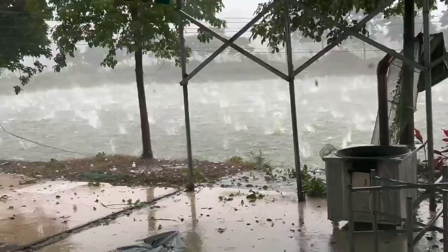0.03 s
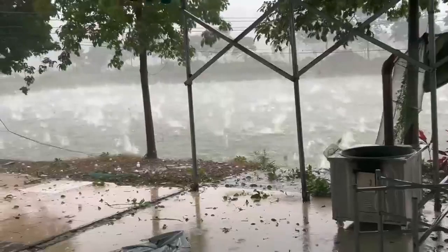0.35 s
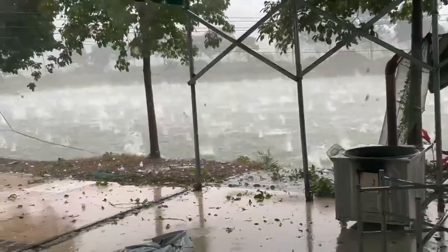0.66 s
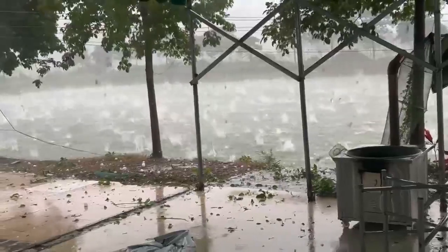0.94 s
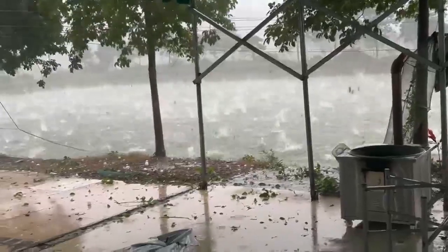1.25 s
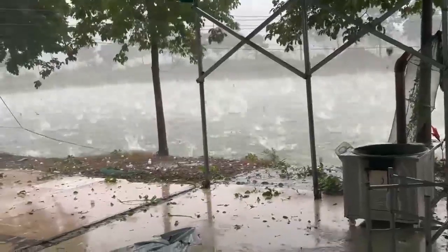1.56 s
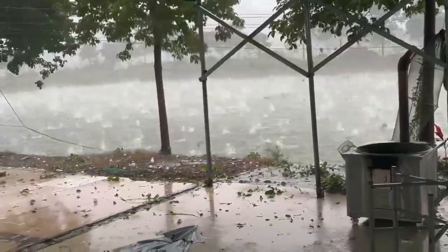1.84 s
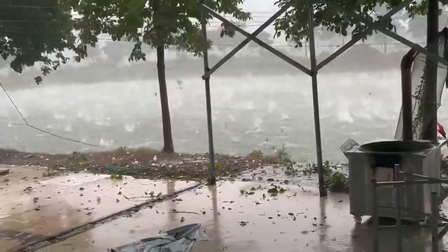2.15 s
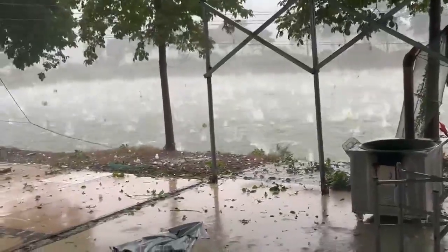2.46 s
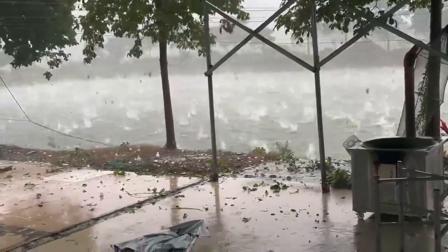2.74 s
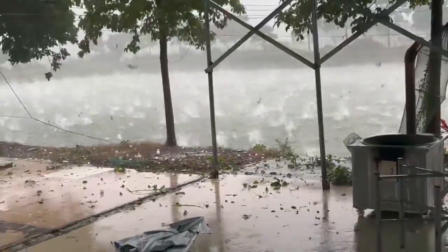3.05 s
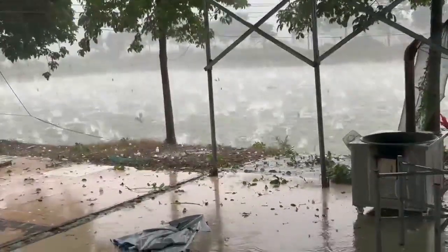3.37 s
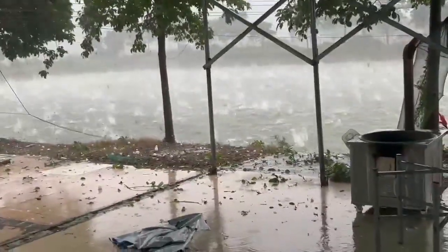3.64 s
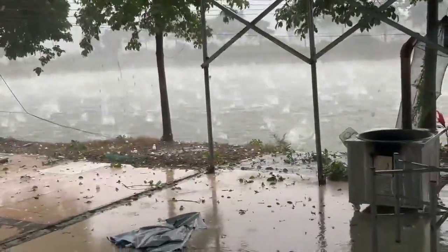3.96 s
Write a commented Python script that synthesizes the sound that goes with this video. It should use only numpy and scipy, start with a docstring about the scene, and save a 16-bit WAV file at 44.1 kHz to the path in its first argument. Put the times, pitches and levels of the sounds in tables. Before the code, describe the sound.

Heavy hail pounds a thin metal roof overhead throughout, with irregular booming thuds, dull patter and cracking ice over rain hissing on a pond and pavement. The hardest knocks land around 0.5 and 1.3 seconds. A steel tube pings at about 1.1 seconds, and ice rattles on metal near 0.7, 1.6, 2.4 and 2.7 seconds. The blows lighten after 3 seconds, with one more strong hit near 4.

```python
"""Hail on a thin sheet roof, heard from underneath, in heavy rain beside a pond.
Each big stone sends a quick, falling bending wave through the sheet: a thud, then a rumble and a
spray of ice. Some blows boom, some land with a hard knock; small stones patter dully.
Others rattle on metal or ping off a steel tube, over the hiss of rain on water and pavement.
A limiter holds the loudest blows down."""
import sys
import numpy as np
from scipy import signal
from scipy.io import wavfile
from scipy.ndimage import uniform_filter1d, minimum_filter1d

SR = 44100
rng = np.random.default_rng(int(sys.argv[2]) if len(sys.argv) > 2 else 0)


def persist_wave(psi):
    """Save psi, clipped to +-1, as 16-bit WAV."""
    counts = np.round(np.clip(psi, -1, 1) * 32767).astype(np.int16)
    wavfile.write(sys.argv[1], SR, np.atleast_2d(counts).T)


N = 176400
T = np.arange(N) / SR


def from_db(db):
    """Decibels to gain."""
    return 10 ** (np.asarray(db) / 20)


def unit_rms(x):
    """Scale to rms 1."""
    return x / np.sqrt(np.mean(x ** 2) + 1e-20)


def at_hz(table, hz):
    """Read a table on a log-frequency axis."""
    freqs, values = np.transpose(table)
    return np.interp(np.log(hz), np.log(freqs), values)


def add(out, start_s, x):
    """Mix x into out at start_s."""
    i = int(np.clip(start_s * SR, 0, N - 1))
    out[i:i + len(x)] += x[:N - i]


def butter(x, hz, kind="band"):
    """Butterworth filter, 12 dB per octave."""
    return signal.sosfilt(signal.butter(2, hz, kind, fs=SR, output="sos"), x)


def drift(per_s):
    """Random wander, rms 1."""
    knots = rng.standard_normal(int(per_s * N / SR) + 2)
    return unit_rms(np.interp(T * per_s, np.arange(len(knots)), knots))


def noise_bands(spectrum):
    """Half-octave (Hz, noise) pairs, summing to rms 1."""
    edges = 25 * 2 ** np.arange(0, 9.6, .5)
    centres = np.sqrt(edges[1:] * edges[:-1])
    white = rng.standard_normal((2, N))
    parts = np.array([from_db(at_hz(spectrum, hz)) * butter(white[k % 2], edges[k:k + 2])
                      for k, hz in enumerate(centres)])
    return list(zip(centres, parts / parts.sum(0).std()))


def ring(x, hz, t60_s):
    """Damped mode: a unit click starts a sine of height 1."""
    r, w = from_db(-60 / (t60_s * SR)), 2 * np.pi * hz / SR
    return signal.lfilter([0, np.sin(w)], [1, -2 * r * np.cos(w), r * r], x + 1e-18)


def resonate(x, hz, width_hz):
    """Steep-sided resonance, rms 1."""
    return unit_rms(butter(x, [hz - width_hz / 2, hz + width_hz / 2]))


def grains(per_s, spread_db):
    """Random clicks, mostly small, a few large."""
    sizes = from_db(spread_db * np.minimum(rng.exponential(1, N), 4)) * rng.choice([-1, 1], N)
    return sizes * (rng.random(N) < per_s / SR)


def swell(start_s, rise_s, fade_s):
    """Linear rise, exponential fade."""
    t = T - start_s
    return np.clip(t / rise_s, 0, 1) * np.exp(-np.maximum(t - rise_s, 0) / fade_s)


def blows(times_s, levels_db, rise_s, fade_s):
    """Envelope of blows whose energies add and decay, with rounded attacks."""
    energy = np.zeros(N)
    for s, db in zip(times_s, levels_db):
        add(energy, s, from_db([db]) ** 2)
    envelope = np.sqrt(signal.lfilter([1], [1, -np.exp(-2 / (fade_s * SR))], energy + 1e-18))
    pole = np.exp(-1 / (rise_s * SR))
    return signal.lfilter([1 - pole], [1, -pole], envelope)


# Downpour contour: (time [s], relative level [dB])
RAIN_CONTOUR = [(0.3, -37.5), (0.76, -36.5), (0.96, -35), (1.47, -35.5), (1.56, -34), (1.66, -34),
                (2.07, -40), (2.2, -35), (2.43, -41.5), (2.63, -39), (2.73, -31.5), (2.9, -38),
                (3.13, -39.5), (3.47, -39), (3.95, -42)]
# Rain on pond and pavement: (frequency [Hz], relative density [dB])
RAIN_SPECTRUM = [(30, -18), (70, 2.5), (150, 8), (300, 1.5), (600, -1), (1100, -5.5), (2000, -4),
                 (3000, -14), (5000, -15), (7500, -16.5), (11000, -20), (13500, -21)]


def rain():
    """Far rain merges into a hiss; near drops tick on the wet pavement."""
    times, levels = np.transpose(RAIN_CONTOUR)
    strength = from_db(0.91 * np.interp(T, times, levels - levels.mean()))
    hiss = sum(noise * from_db(3.72 * drift(24.973)) for _, noise in noise_bands(RAIN_SPECTRUM))
    clicks = grains(per_s=220, spread_db=3.6)
    pitches_hz = np.geomspace(1100, 13000, 20)
    pitch_index = rng.integers(0, len(pitches_hz), N)
    tilt = from_db(-0.5 * np.log2(pitches_hz / pitches_hz[0]))
    drops = sum(tilt[k] * ring(clicks * (pitch_index == k), hz, t60_s=4.8 / hz)
                for k, hz in enumerate(pitches_hz))
    return strength * (from_db(-33) * hiss + from_db(-43.5) * unit_rms(drops))


def patter(per_s=19, level_db=-36, spread_db=3):
    """Small stones land all over the roof with dull puffs."""
    when, size = rng.random((int(per_s * N / SR), 2)).T
    body = unit_rms(butter(rng.standard_normal(N), [170, 620]))
    levels = level_db + spread_db * (2 * size - 1)
    return body * blows(when * N / SR, levels, rise_s=0.00081, fade_s=0.02)


def bending_wave(body_hz, distance, start_hz=824):
    """Highs travel faster in the sheet, so the pitch falls, more slowly from farther off."""
    t = T[:SR // 12]
    body_s, attack_s, fade_s = 0.01233 * distance, 0.0014, 0.012 * distance
    period_s = 1 / start_hz + (1 / body_hz - 1 / start_hz) * (t / body_s) ** 0.858
    envelope = (1 - np.exp(-t / attack_s)) * np.exp(-(t / fade_s) ** 1.06)
    return -np.sin(2 * np.pi * np.cumsum(1 / period_s) / SR) * envelope


def scatter(wave, db, near_db=-10, far_db=-18, fade_s=0.0069):
    """Weaker stones land farther off; the sheet's ribs scatter more of their wave."""
    t = T[:SR // 30]
    reflections = rng.standard_normal(len(t)) * np.exp(-t / fade_s)
    jumble = unit_rms(signal.fftconvolve(wave, reflections)[:len(wave)])
    share = np.clip((near_db - db) / (near_db - far_db), 0, 1)
    return np.sqrt(1 - share) * wave + np.sqrt(share) * wave.std() * jumble


# Big stones on the roof: (time [s], relative thud level [dB], body pitch [Hz], relative ice level [dB])
BIG_STONES = [(0.111, -15.5, 147, -29), (0.172, -11, 176, -35), (.217, -10, 228, -34.5),
              (0.285, -19.5, 183, -31), (.400, -8, 206, -28.5), (.463, 0, 191, -30), (0.485, -12, 268, -43),
              (.522, -6, 369, -34.5), (0.613, -10, 233, -40), (0.744, -4.5, 159, -30),
              (0.817, -2.5, 126, -31.5), (0.833, -17, 130, -31.5), (0.929, -6, 207, -28),
              (0.943, -10, 144, -49), (1.021, -14.5, 210, -58), (1.099, -11, 195, -32.5),
              (1.163, -18, 198, -31), (1.305, -21, 181, -32), (1.322, 3, 140, -20), (1.334, -8, 149, -42),
              (1.36, 1, 156, -31), (1.383, -10, 255, -42), (1.422, -20, 248, -30.5),
              (1.611, -8.5, 194, -28.5), (1.667, -5, 138, -30.5), (1.748, -4, 186, -32),
              (1.794, -8, 194, -56), (1.873, -4.5, 185.5, -27), (1.905, -12, 246, -55),
              (1.962, -8, 221, -30), (2.000, -5.5, 203.4, -29), (2.031, -8, 197, -27.5),
              (2.06, -5.5, 212, -30), (2.104, -10.5, 232, -33.5), (2.138, -4, 147, -28),
              (2.17, -16, 149, -33), (2.338, -27, 200, -29.5), (2.42, -16, 155, -25),
              (2.441, -4.5, 140, -26.5), (2.462, -5, 186, -32), (2.531, -12, 220, -33),
              (2.577, -10.5, 200, -31.5), (2.647, -7.5, 154, -29.5), (2.668, -10.5, 143, -29.5),
              (2.873, -5, 176, -40), (2.912, -10.5, 215, -53), (3.104, -5.5, 158, -34.5),
              (3.12, -9, 170, -33), (3.168, -17, 203, -45), (3.325, -14.5, 225, -51),
              (3.352, -14.5, 186, -34.5), (3.406, -17, 156, -33.5), (3.549, -14, 204, -32),
              (3.616, -18, 176, -52), (3.681, -13.5, 233, -35.5), (3.775, -17, 198, -34),
              (3.895, -17, 220, -34.5), (3.968, -4, 226, -28.5)]


def thuds(direct_db=-3.5, echo_db=-17.5, echo_s=0.016):
    """Each big stone's bending wave arrives directly, then returns from the sheet's edge."""
    out = np.zeros(N)
    jitter = rng.uniform(-1.096, 1, (len(BIG_STONES), 3))
    for (s, db, hz, _), (far, lag, detune) in zip(BIG_STONES, jitter):
        direct = bending_wave(hz, distance=1 + 0.16 * far)
        echo = bending_wave(hz * (1.332 + 0.3 * detune), distance=1.353)
        add(out, s, from_db(db + direct_db) * scatter(direct, db))
        add(out, s + echo_s * (1 + 0.365 * lag), from_db(db + echo_db) * scatter(echo, db + echo_db))
    return out


# Sheet rumble: (frequency [Hz], relative density [dB])
RUMBLE_SPECTRUM = [(30, -33), (50, -7), (72, -2.5), (130, 0.5), (240, 5.5), (450, -4), (700, -8.5),
                   (1200, -19.5), (2100, -15.5), (4000, -63)]
# Sheet decay: (frequency [Hz], t60 [s])
RUMBLE_DECAY = [(70, 0.59), (200, 0.22), (500, 0.41), (2000, 0.31)]


def rumble():
    """The sheet rumbles after each big stone, each band decaying at its own rate."""
    times, levels, _, _ = np.transpose(BIG_STONES)
    out = np.zeros(N)
    for hz, noise in noise_bands(RUMBLE_SPECTRUM):
        fade_s = at_hz(RUMBLE_DECAY, hz) / np.log(1000)
        out += noise * blows(times, levels - 10.5, rise_s=0.0021, fade_s=fade_s)
    return out


def clacks(centre_hz=1200, peak_s=0.00087):
    """Big stones clack at the instant of contact with the roof."""
    out, t = np.zeros(N), T[:SR // 10]
    envelope = t / peak_s * np.exp(1 - t / peak_s)
    for s, _, _, ice_db in BIG_STONES:
        hz = centre_hz * 2 ** rng.normal(0, 0.4)
        add(out, s, from_db(ice_db + 3) * np.sin(2 * np.pi * hz * t) * envelope)
    return out


# Shattering ice: (frequency [Hz], relative density [dB])
ICE_SPECTRUM = [(300, -13), (800, 8), (2000, 0.5), (3200, 0), (5000, -5.5), (8000, -5.5), (13500, -16.5)]


def ice(pivot_db=-30.5):
    """Each big stone cracks and sprays gritty chips; hard hits crack out of proportion."""
    times, _, _, levels = np.transpose(BIG_STONES)
    chips = sum(noise * from_db(1.95 * drift(150)) for _, noise in noise_bands(ICE_SPECTRUM))
    grit = unit_rms(chips * from_db(0.26 * drift(900)))
    excess_db = levels - pivot_db
    crack = blows(times + 0.00033, levels + excess_db - 2.5, rise_s=0.00066, fade_s=0.01)
    spray = blows(times, levels - 1.5, rise_s=0.0099, fade_s=0.062)
    return grit * (crack + spray)


# Deep roof modes: (frequency [Hz], gain [dB], t60 [s])
DEEP_MODES = [(70.6, -22, 0.36), (105, -13, 0.16), (146.6, -18.5, 0.22)]


def roof_modes(pivot_hz=140, db_per_octave=32, lag_s=0.0076):
    """Heavy, low-pitched stones drive the roof's deep modes hardest."""
    pushes = np.zeros(N)
    for s, db, hz, _ in BIG_STONES:
        add(pushes, s + lag_s, from_db([db + db_per_octave * np.log2(pivot_hz / hz)]))
    pushes = butter(pushes, 54, "high")  # the pushes are high-passed, so little deep bass builds up
    return sum(from_db(db) * ring(pushes, hz, t60_s) for hz, db, t60_s in DEEP_MODES)


# Hard knocks and ticks: (time [s], relative level [dB], frequency [Hz], t60 [s])
HARD_KNOCKS = [(.5208, -4.5, 1224, .013), (.5218, 1.5, 677, 0.012), (0.5209, -18, 1670, 0.017),
               (1.307, -18, 960, 0.011), (1.3211, -2, 870, 0.011), (1.4215, -4.5, 505, 0.017),
               (1.422, -12, 4800, 0.0024), (1.873, -11, 840, 0.011), (1.961, -18, 1200, 0.0069),
               (2.4215, -23, 8400, 0.0058), (2.423, -16.5, 775, 0.014), (3.412, -18, 11000, 0.00097),
               (3.436, -14, 10800, 0.001), (3.895, -14.5, 424, .022), (3.97, -20, 1950, 0.01)]


def knocks(rise_cycles=1.83):
    """Short, hard knocks and sharp ticks, many being the bright attack of stones hitting the roof."""
    out, t = np.zeros(N), T[:SR // 10]
    for s, db, hz, t60_s in HARD_KNOCKS:
        rise = 1 - np.exp(-(t * hz / rise_cycles) ** 2)
        envelope = 2 * rise * from_db(-60 * t / t60_s)
        add(out, s, from_db(db + 5.5) * np.sin(2 * np.pi * hz * t) * envelope)
    return out


# Single rings: (time [s], level [dB], frequency [Hz], width [Hz], fade [s])
METAL_RINGS = [(.527, -25.5, 1200, 796, 0.06), (1.09, -39, 3480, 600, 0.06),
               (1.16, -35.5, 3270, 1200, 0.081), (1.594, -24, 1620, 900, 0.13),
               (2.005, -27.5, 2040, 600, 0.072), (2.086, -26, 1190, 350, 0.05),
               (2.425, -27, 2100, 700, 0.06), (2.757, -27.5, 2030, 130, 0.024),
               (3.565, -44.5, 4740, 185.2, 0.07), (3.577, -31.5, 1184, 108, 0.07),
               (3.608, -38, 775, 90, 0.044)]


def metal_rings(chips):
    """Ice chips briefly excite metal parts, one resonance each."""
    return sum(from_db(db) * resonate(chips, hz, width_hz) * swell(s, rise_s=0.012, fade_s=fade_s)
               for s, db, hz, width_hz, fade_s in METAL_RINGS)


# Ice rattling on a metal part: (time [s], level [dB], rise [s], fade [s])
RATTLE_BURSTS = [(0.718, -24, 0.018, 0.093), (1.585, -25.5, 0.009, 0.082), (2.42, -28.5, 0.0099, 0.11),
                 (2.745, -22, 0.015, 0.077)]
# The part's resonances: (frequency [Hz], width [Hz], relative level [dB])
RATTLE_MODES = [(1233, 60, -0.5), (1285, 44, 2), (1467, 45, -19), (2015, 127, 2.5), (2224, 520, 0),
                (3280, 236, 0.5), (3550, 220, -6.5)]


def metal_rattles(chips, lag_s_per_octave=0.0089):
    """Skittering chips keep one metal part ringing; higher resonances speak later."""
    out = np.zeros(N)
    norm = np.linalg.norm(from_db([db for _, _, db in RATTLE_MODES]))
    for hz, width_hz, mode_db in RATTLE_MODES:
        lag_s = lag_s_per_octave * np.log2(hz / RATTLE_MODES[0][0])
        envelope = sum(from_db(db) * swell(s + lag_s, rise_s, fade_s)
                       for s, db, rise_s, fade_s in RATTLE_BURSTS)
        out += from_db(mode_db) / norm * resonate(chips, hz, width_hz) * envelope
    return out


# Soft, heavy blows: (time [s], level [dB], frequency [Hz], rise [s])
SOFT_BLOWS = [(0.941, -5, 170, 0.0041), (1.361, -9.5, 203, .005), (2.14, -6, 192, 0.0086),
              (2.441, -5.5, 210, 0.0048), (2.673, -1, 232, 0.0053), (2.675, -14, 77, 0.024),
              (2.696, -8.5, 224, 0.0054), (3.468, -24.5, 86, 0.023)]


def booms():
    """Soft blows make the sheet boom for a few slow cycles."""
    out, t = np.zeros(N), T[:SR // 3]
    for s, db, hz, rise_s in SOFT_BLOWS:
        envelope = (t / rise_s * np.exp(1 - t / rise_s)) ** 2
        add(out, s, from_db(db) * np.sin(2 * np.pi * hz * t) * envelope)
    return out


# Steel tube modes: (frequency [Hz], relative level [dB], t60 [s])
TUBE_MODES = [(4330, -5, 0.6), (4450, -2.5, 0.27), (4500, -2, 0.17), (4700, -9, .08)]


def tube_ping(start_s=1.065, rise_s=0.004, chatter_db=4.5, chatter_per_s=170):
    """A stone strikes a loose tube; its close modes beat and chatter as they fade."""
    out, t = np.zeros(N), np.maximum(T - start_s, 0)
    for hz, db, t60_s in TUBE_MODES:
        envelope = from_db(db + chatter_db * drift(chatter_per_s) - 60 * t / t60_s)
        out += envelope * np.sin(2 * np.pi * hz * t + drift(chatter_per_s))
    return from_db(-28) * np.minimum(t / rise_s, 1) * out


def scene():
    """Roof, ice, metal and rain, in mono."""
    roof = thuds() + rumble() + roof_modes() + booms() + patter()
    shatter = ice()
    chips = grains(per_s=2800, spread_db=2.15)
    metal = metal_rings(chips) + metal_rattles(chips) + tube_ping()
    return (roof + shatter + metal + clacks() + knocks() + rain())[None]


def limiter(x, limit_db=-4, release_db_per_s=95):
    """The gain drops at once on peaks and recovers at a steady rate."""
    over_db = np.maximum(20 * np.log10(np.abs(x) + 1e-9) - limit_db, 0)
    release_db = release_db_per_s * T
    cut_db = np.maximum.accumulate(over_db + release_db) - release_db
    return x * from_db(uniform_filter1d(minimum_filter1d(-cut_db, size=64), size=64))


def record(dry):
    """Abrupt fade-in, treble notch, limiter, steep low-pass."""
    start_s, rise_s = 0.091, 0.045
    notch_hz, width_hz, cutoff_hz = 9817, 3100, 14100
    x = dry[0] * np.clip((T - start_s) / rise_s, 0, 1)
    x = butter(x, [notch_hz - width_hz / 2, notch_hz + width_hz / 2], "bandstop")
    lowpass = signal.ellip(10, .3, 80, cutoff_hz, fs=SR, output="sos")
    return signal.sosfilt(lowpass, limiter(x))[None]


dry = scene()
out = record(dry)
persist_wave(out)
```